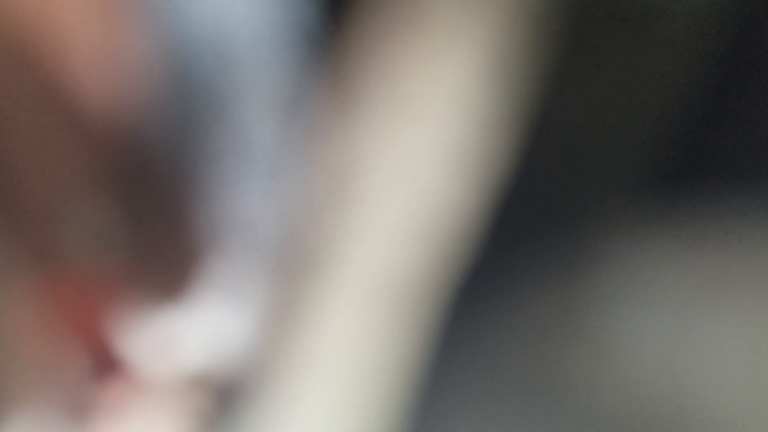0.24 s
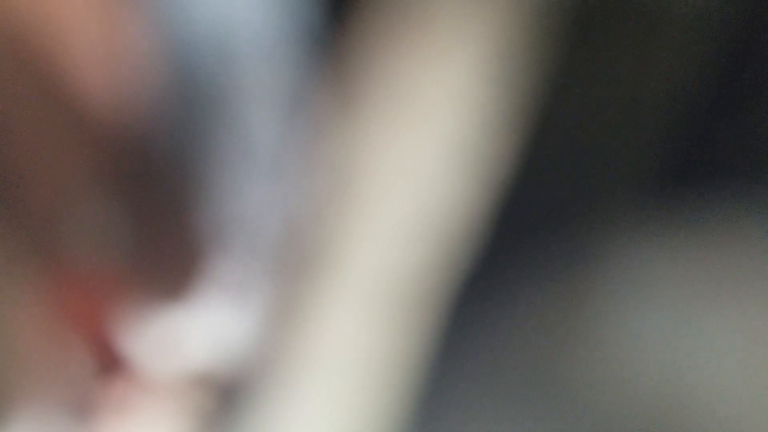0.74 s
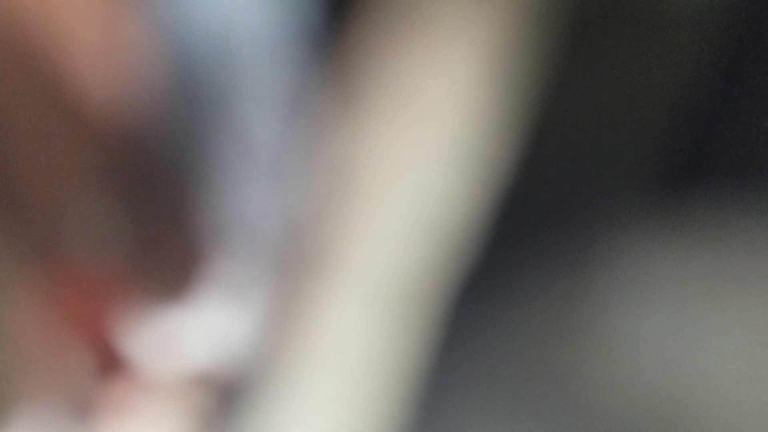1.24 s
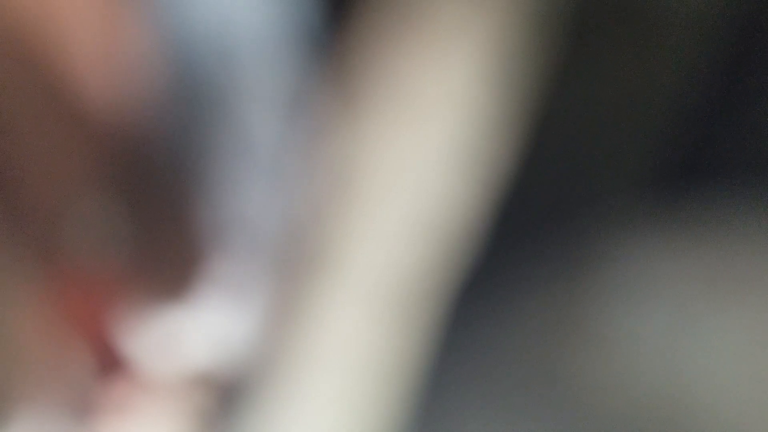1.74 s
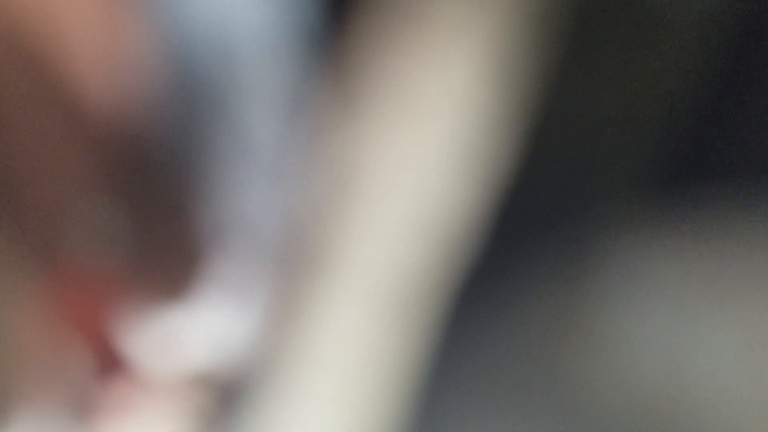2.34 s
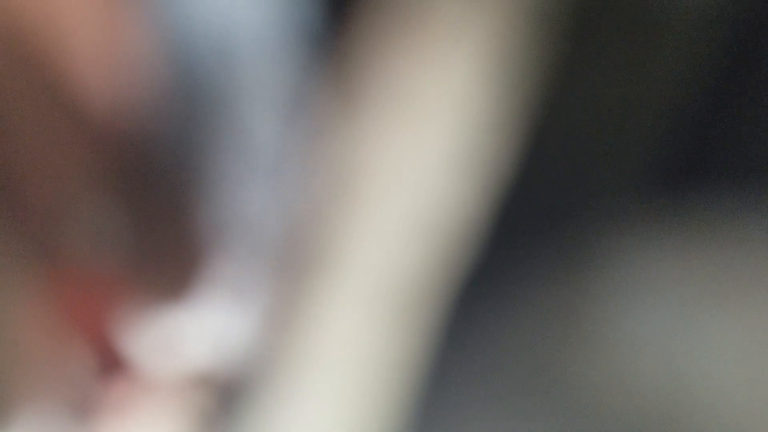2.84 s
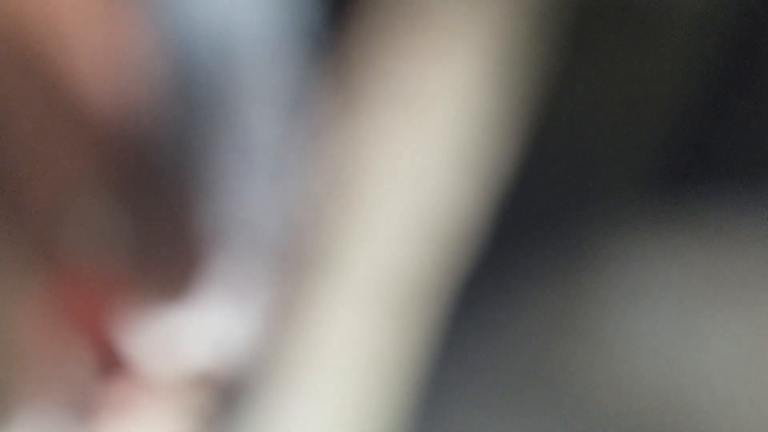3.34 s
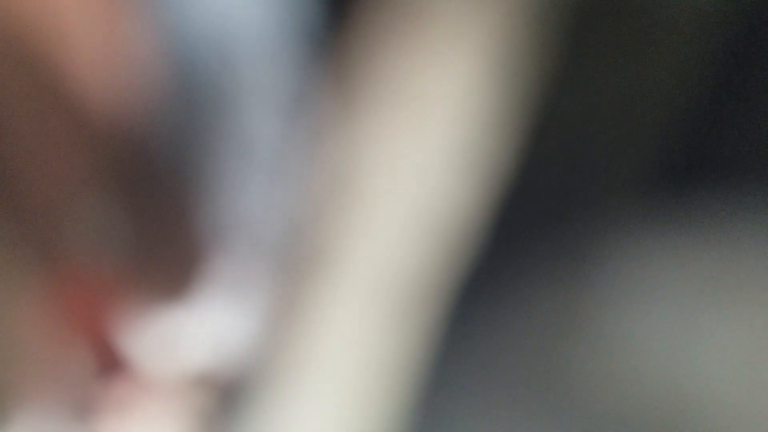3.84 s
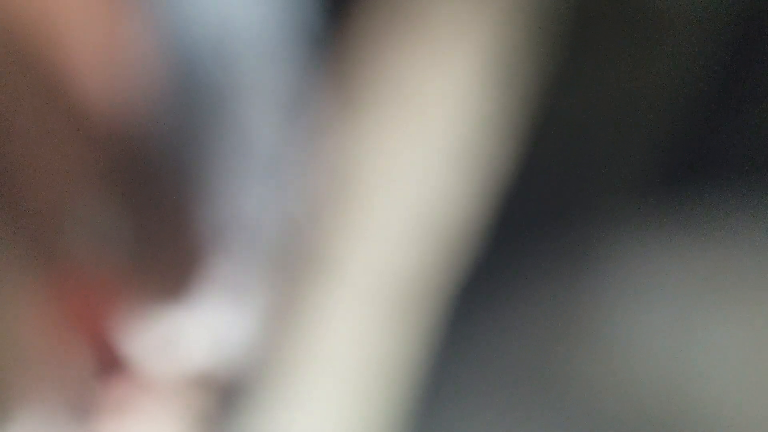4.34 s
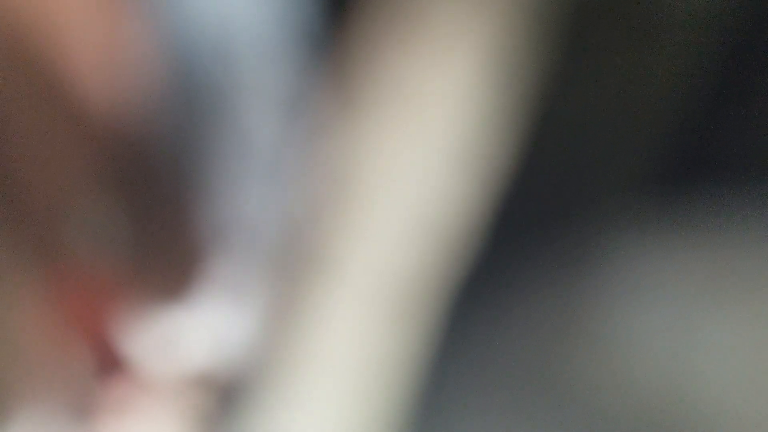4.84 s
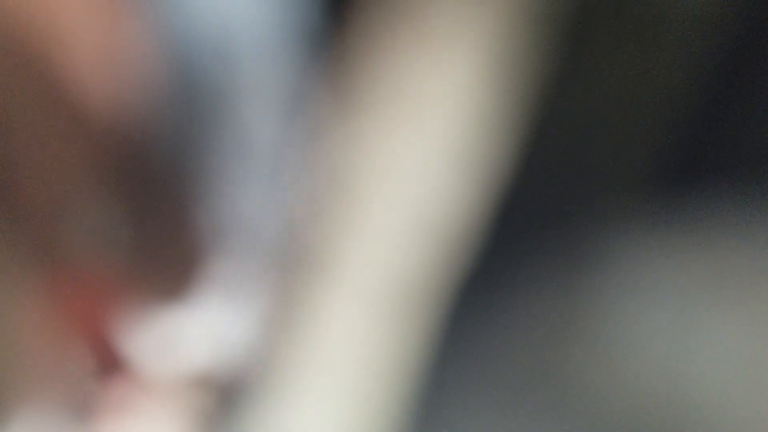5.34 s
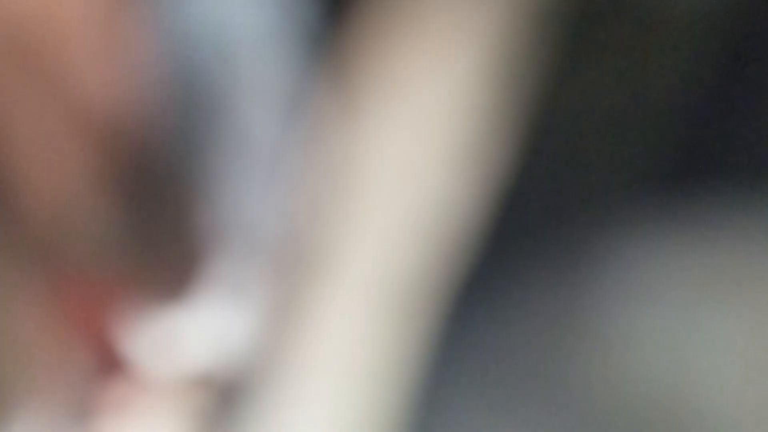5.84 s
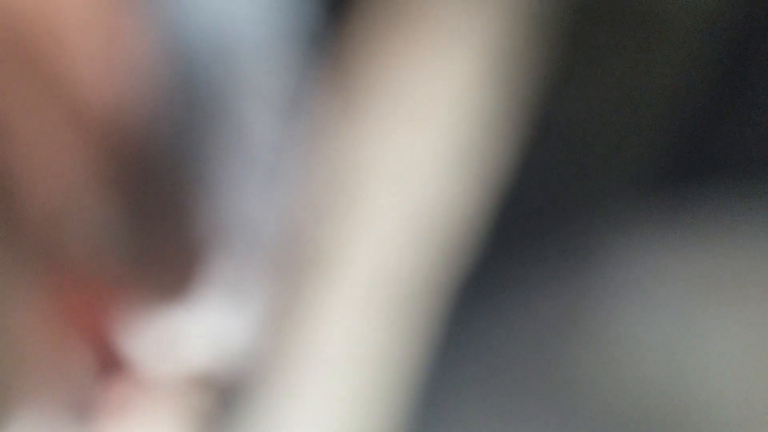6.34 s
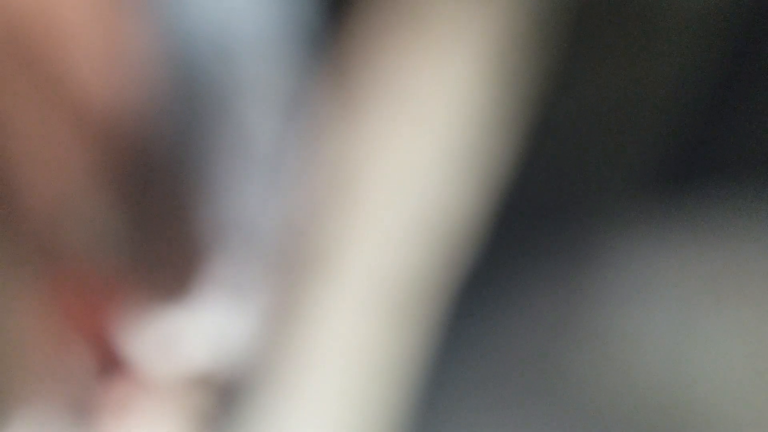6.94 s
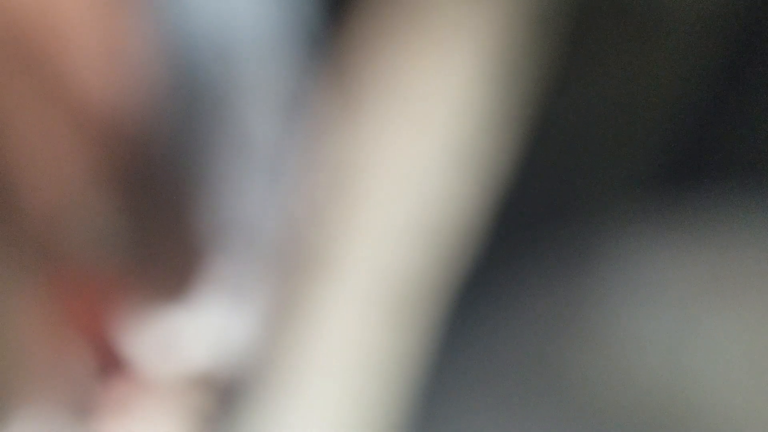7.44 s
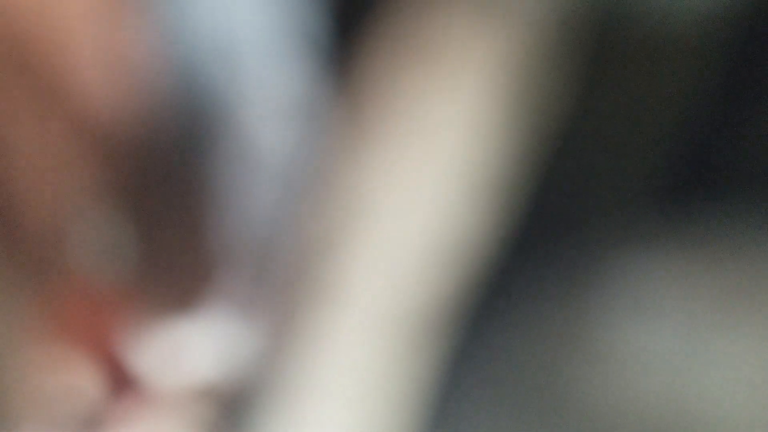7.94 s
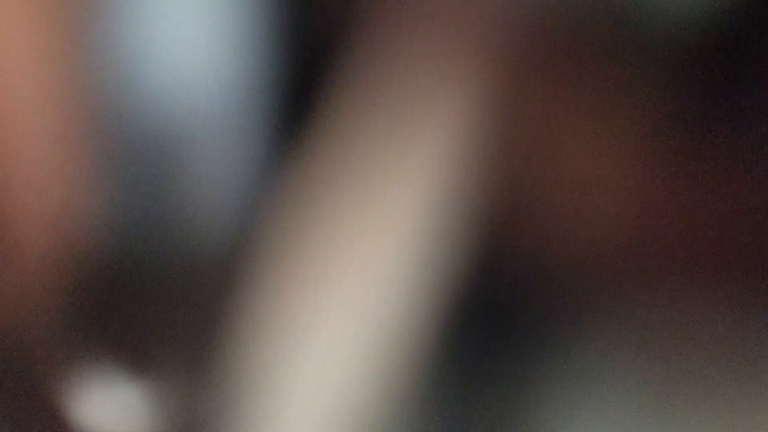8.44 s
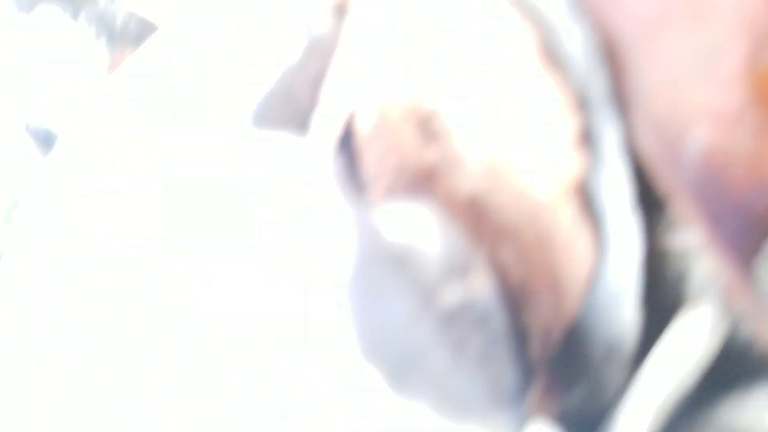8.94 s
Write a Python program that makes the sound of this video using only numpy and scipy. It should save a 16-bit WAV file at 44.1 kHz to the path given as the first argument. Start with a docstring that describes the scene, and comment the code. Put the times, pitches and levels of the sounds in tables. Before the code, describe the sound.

Liquid soap glugs into water, heard from inside a small, tightly echoing bucket. Sparse plops and skin rasps come first, then a strong cluster of hollow bubbles, later uneven gurgles with light splashing and low sloshing. Towards the end handling takes over: sticky clicks, scrapes, hard knocks and dull bumps on the microphone's casing, with faint regular glugs between and dry crinkles last.

```python
"""Liquid soap glugs from a plastic bottle into a bucket of water, very near two microphones.
From the start wet fingers slide and tick over a low rumble and a faint hiss; a first few bubbles ring.
At 2.6 s comes the strongest glug, several rings close together; more follow, rising in pitch, with splashes.
From 6.9 s fingers also knock on the casing; from 7.7 s five soft glugs come evenly. Last, the grip crinkles.
Bubbles are dying sines, rubbing many tiny ringing pops, sloshing low noise, and the echo fading noise."""
import sys
import numpy as np
from scipy import signal
from scipy.fft import rfft, irfft, next_fast_len
from scipy.io import wavfile
from scipy.ndimage import uniform_filter1d

SR = 44100
rng = np.random.default_rng(int(sys.argv[2]) if len(sys.argv) > 2 else 0)


def master_out(mix):
    """Clip the mix to full scale and print it as 16-bit PCM to the path in sys.argv[1]."""
    frames = np.transpose(np.atleast_2d(mix))
    ceiling = np.clip(frames, -1, 1)
    pcm = np.round(ceiling * 32767).astype(np.int16)
    wavfile.write(sys.argv[1], SR, pcm)


N = 405719
TIME = np.arange(N) / SR

# tone of scraping skin and droplets: (frequency [Hz], relative level [dB])
SCRAPE_TONE = [(250, -23), (700, 7.5), (1900, 7.5), (4000, 4.5), (8000, -3), (12500, -3), (16000, -10)]
# tone of dull pushes and moving water: (frequency [Hz], relative level [dB])
PUSH_TONE = [(25, -48.5), (70, -8), (150, -3.5), (260, -1), (450, -3), (620, -5.5), (900, -19), (2000, -57)]
# the microphones turn against the bucket: (time [s], delay of the left one [s])
LEFT_DELAY = [(2.6, -.00035), (4.3, .00025), (6.5, .0004)]


def bubbles(pan_db=2.8):
    """Air bubbles ring in the water; the strongest glug is several rings close together."""
    out = np.zeros((2, N))
    for s, hz, db, t60, rise in bubble_rings():
        ring = bubble(ports(s, SR // 4), hz, t60, rise)
        add(out, s, amp(db) * panned(pan_db) * ring)
    return out


def bubble_rings(even_count=5, even_start_s=7.722, even_gap_s=0.168):
    """Lists every ring: the uneven ones, where high ones chirp more steeply, then the evenly spaced glugs."""
    # rings of air bubbles: (time [s], starting pitch [Hz], level [dB], time to fade by 60 dB [s])
    uneven = [(.004, 404, -27.5, 0.059), (0.503, 524, -14.5, 0.092), (.582, 1200, -12.5, 0.048),
              (0.61, 1660, -25, 0.03), (.631, 1400, -31, .035), (.666, 620, -25.5, 0.066),
              (.787, 532, -32, 0.074), (.915, 492, -33.5, 0.093), (2.331, 285, -34, 0.23),
              (2.606, 501, -14.5, .1), (2.633, 342, -0.5, 0.051), (2.639, 473, -5, 0.14),
              (2.649, 426.6, -7.5, 0.15), (2.667, 349, -7.5, 0.08), (2.835, 310.4, -12, 0.1),
              (2.833, 471, -13, 0.069), (2.848, 306, -15, 0.067), (2.896, 296, -20.5, .16),
              (4.047, 471, -32, .15), (4.262, 484, -35, 0.073), (4.445, 274, -22.5, 0.031),
              (4.454, 572, -18.5, 0.086), (4.599, 291, -18.5, 0.23), (4.716, 414, -25, 0.11),
              (4.834, 398, -32, 0.081), (4.894, 818, -18, .1), (4.976, 271.8, -19.5, 0.09),
              (5.103, 267, -21.5, 0.16), (5.104, 402.5, -13, 0.051), (5.171, 383, -27, 0.11),
              (5.346, 490, -15.5, 0.023), (5.451, 252, -17, 0.13), (5.527, 335, -20.5, 0.11),
              (5.548, 220, -19.5, 0.11), (5.79, 245, -33.5, 0.062), (5.842, 520, -32.5, .15),
              (5.988, 510, -28, 0.064), (6.226, 546, -35, 0.13), (6.397, 462, -30, 0.22),
              (6.448, 368, -13, 0.12), (6.894, 471, -23, .07), (7.043, 449, -23, 0.098),
              (7.356, 587, -22, 0.027), (7.393, 242, -29.5, 0.084), (8.73, 676, -25.5, 0.066)]
    slow_rise, chirp_rise = 1.6, 47  # octaves per second: large bubbles climb slowly, small ones chirp
    chirp_above_hz = 1000
    found = []
    for s, hz, db, t60 in uneven:
        rise = chirp_rise if hz > chirp_above_hz else slow_rise
        found.append((s, hz, db, t60, rise))
    for k in range(even_count):
        found.append((even_start_s + k * even_gap_s, 247.3, -33, 0.11, 6.3))  # same columns, rise last
    return found


def bubble(t, hz, t60, rise, attack_s=0.001, wobble=0.042):
    """A dying sine: its pitch climbs near the surface and wavers as the bubble deforms."""
    waver = evened(uniform_filter1d(rng.standard_normal(t.shape[-1]), SR // 150))
    # wobble is the typical share by which the pitch wavers
    turns = hz * (t + np.log(2) * rise * t ** 2 / 2 + wobble * np.cumsum(waver) / SR)
    return np.sin(2 * np.pi * turns) * decay(t, t60) * (1 - np.exp(-t / attack_s))


def ports(s, length):
    """Time since a sound in the bucket reached the left and the right microphone."""
    lag = np.interp(s, *np.transpose(LEFT_DELAY))
    return np.maximum(np.arange(length) / SR - np.array([[lag], [-lag]]) / 2, 0)


def splashes(pan_db=4, full_db=-18, growth=0.092, most_push_db=-36):
    """The surface breaks: each ring starts with a noisy splash that grows with the ring's level."""
    splash_s, splash_db, tilt_db = 0.016, -27.5, -6  # level is set against the ring; tilt per octave
    push_db, push_hz, push_db_per_oct = -17, 382, -10  # the push is weaker for rings above push_hz
    out = np.zeros((2, N))
    for s, hz, db, _, _ in bubble_rings():
        force_db = db + growth * min(db - full_db, 0)  # a ring below full_db splashes a little less
        octaves_above = np.log2(max(hz / push_hz, 1))
        dull_db = min(force_db + push_db + push_db_per_oct * octaves_above, most_push_db)
        splash = burst(splash_s, force_db + splash_db, tilt_db, dull_db, attack_share=0.05)
        add(out, s, panned(pan_db) * splash)
    return out


def gurgles(per_s=280, scatter_oct=0.28, t60=0.019, rise=4, pan_db=3):
    """Soap folds into the water: a quick chain of overlapping bubbles whose pitch drifts."""
    # chains: (time [s], length [s], first pitch [Hz], last pitch [Hz], level [dB])
    chains = [(.675, 0.059, 2600, 1900, -56), (2.606, .06, 480, 424, -26.5), (2.68, .04, 418, 430, -40),
              (2.902, 0.036, 494, 560, -40), (2.936, 0.18, 327, 394, -50), (4.699, .02, 268, 580, -31),
              (4.871, 0.022, 626, 884, -24.5), (4.91, 0.069, 950, 1060, -38), (5.193, 0.032, 400, 556, -42),
              (5.364, 0.087, 473, 680, -38), (5.965, 0.13, 400, 1260, -47.5), (6.382, .3, 478, 474, -40.5)]
    out = np.zeros((2, N))
    for s, length, from_hz, to_hz, db in chains:
        t, chain = ports(s, SR // 10), np.zeros((2, SR // 2))
        count = int(per_s * length) + 1
        for k, (late, size, small) in enumerate(rng.random((count, 3))):
            share = (k + late) / count  # how far along the chain
            drift_hz = from_hz * (to_hz / from_hz) ** share
            hz = drift_hz * 2 ** (scatter_oct * (2 * small - 1))
            turns = hz * t * (1 + np.log(2) * rise * t / 2)
            ring = np.sin(2 * np.pi * turns) * decay(t, t60) * (1 - np.exp(-hz * t))
            add(chain, share * length, (.5 + size) * (1 - share / 2) * ring)
        chain *= np.sqrt(length * SR / np.sum(chain[0] ** 2))  # same power for every chain
        add(out, s, amp(db) * panned(pan_db) * chain)
    return out


def slosh(stir, side_db=2):
    """Stirred water: a soft, lumpy low wash of noise."""
    wash = paired(rng.standard_normal((2, N)), likeness=0.67) * flutter(depth_db=3.5, span_s=0.011)
    return stir * panned(side_db) * coloured(wash, PUSH_TONE)


def stirring(rasp, hand_db=-4.5, ring_db=-41.5, settle_s=0.17):
    """How strongly the water moves: it follows the hand, and each bubble ring adds a swirl that settles."""
    kicks = np.zeros(N)
    for s, _, db, _, _ in bubble_rings():
        kicks[max(round(s * SR), 0)] += amp(db + ring_db) ** 2
    swirl = signal.lfilter([1], [1, -np.exp(-2 / (settle_s * SR))], kicks)  # power, so it fades twice as fast
    return np.sqrt(swirl + (amp(hand_db) * rasp) ** 2)


def rubbing(skin, rasp, drops_db=-30, drops_per_s=26, drop_cycles=7):
    """Wet skin slides with uneven pressure: a fine hiss, a coarser rasp and stray droplets."""
    # tones of the fine hiss and the coarse rasp: (frequency [Hz], relative level [dB])
    skin_tone = [(200, -61), (1700, -14), (3700, 7.5), (7000, 0.5), (9000, 0), (12000, 6), (16000, 2.5)]
    rasp_tone = [(60, -44), (250, 10), (600, 10), (1100, 4), (2200, 3), (3500, -10.5), (6000, -15),
                 (12000, -43)]
    grip = slips(N, per_s=2200, spread_db=7.0, smooth=1.0, likeness=0.054)
    grip = grip * flutter(depth_db=2.0, span_s=0.0034) * flutter(depth_db=3.0, span_s=.018)
    drops = slips(N, drops_per_s, spread_db=5.5, smooth=0, likeness=0.17, cycles=drop_cycles)
    sound = skin * coloured(grip, skin_tone) + rasp * coloured(grip, rasp_tone)
    sound += amp(drops_db) * np.sqrt(rasp) * coloured(drops, SCRAPE_TONE)  # droplets keep falling in the lulls
    return side(TIME, reach=0.79) * sound


def pressure():
    """Gains of skin hiss and rasp over time: a slide starts lightly, firms up, then eases and lifts off."""
    # slides of the fingers: (start [s], length [s], fine hiss of skin [dB], coarse rasp [dB])
    slide_list = [(0, 0.12, -48.5, -50), (0.148, 0.32, -40.5, -47.5), (0.51, 0.42, -56.5, -53),
                  (1.256, 0.084, -59.5, -63), (1.478, 0.25, -49, -87), (2.244, 0.52, -51, -56),
                  (2.601, 0.095, -39.5, -31.5), (2.78, 0.4, -59.5, -48.5), (2.972, 0.24, -48.5, -62),
                  (3.189, 0.14, -41, -49.5), (3.209, 0.48, -52, -55), (3.881, 0.27, -48.5, -55),
                  (4.254, 0.61, -53.5, -52), (4.939, 0.76, -50, -46.5), (5.255, 0.26, -34.5, -40),
                  (5.814, 0.21, -45, -49.5), (6.03, 0.43, -58.5, -60), (6.392, 0.15, -40, -40.5),
                  (6.517, 0.35, -38.5, -43.5), (6.811, 0.077, -30, -32.5), (6.991, 0.17, -40.5, -41),
                  (7.23, 0.38, -56.5, -51), (7.526, 0.047, -32.5, -36.5), (7.9, 0.91, -55, -54.5),
                  (8.418, 0.29, -36, -38), (8.677, 0.63, -44, -43)]
    touch_db, peak_share, ease_db = -6, 0.37, -9.5  # firmest at this share of the length
    grip_db_per_s, lift_db_per_s = 469, -170  # how fast the finger lands and lifts off
    rest_db = -79  # resting fingers never keep quite still
    clock = TIME[::64][:N // 64]  # a coarse clock is enough for a slow gain
    power = np.full((2, N // 64), amp(rest_db) ** 2)
    for start, length, skin_db, rasp_db in slide_list:
        t = clock - start
        press_db = np.interp(t / length, [0, peak_share, 1], [touch_db, 0, ease_db])
        landing_db = grip_db_per_s * np.minimum(t, 0)
        lifting_db = lift_db_per_s * np.maximum(t - length, 0)
        shape = amp(press_db + landing_db + lifting_db)
        power += (amp([[skin_db], [rasp_db]]) * shape) ** 2
    return [np.interp(TIME, clock, np.sqrt(p)) for p in power]


def crackle(skin, per_s=28, spread_db=4.0, level_db=-21, follow=0.69, tilt_db=2.0):
    """Wet skin sticks and lets go in fine snaps, which stand out most under a light touch."""
    snaps = slips(N, per_s, spread_db, smooth=0, likeness=0.39, cycles=1.0)
    return amp(level_db) * skin ** follow * side(TIME, reach=1.6) * coloured(snaps, SCRAPE_TONE, tilt_db)


def strokes():
    """Skin catches, or liquid slaps, briefly beside the microphones."""
    # (time [s], length [s], scrape level [dB], tilt above 1 kHz [dB per octave], dull push level [dB])
    stroke_list = [(2.579, 0.021, -29.5, -0.5, -56), (2.601, 0.017, -19, -7, -45),
                   (2.629, 0.039, -19.5, -12, -42), (2.829, 0.011, -28.5, -5.5, -51),
                   (3.189, 0.046, -35, 1.5, -35), (3.249, 0.015, -24.5, 17.5, -38.5),
                   (5.342, 0.0051, -23.5, 5, -31), (5.446, .0034, -24.5, 2.5, -25.5),
                   (6.383, 0.015, -29, 0, -28), (6.447, 0.02, -30, -17, -19),
                   (6.635, 0.027, -29.5, 4.5, -29.5), (6.795, 0.011, -21.5, 2, -24.5),
                   (7.483, 0.015, -25, -1.5, -24.5), (7.501, 0.037, -19.5, -3.5, -23.5),
                   (7.693, 0.035, -35.5, -6, -43.5), (8.322, 0.042, -29, 2.5, -46.5),
                   (8.361, 0.026, -25, 0, -51), (8.428, .052, -22, -1, -25),
                   (8.522, 0.029, -28.5, 0, -39.5), (8.629, 0.0067, -28.5, 5.5, -41),
                   (8.789, 0.016, -28, -7.5, -26)]
    out = np.zeros((2, N))
    for s, *stroke in stroke_list:
        add(out, s, side(s, reach=1.66) * burst(*stroke, attack_share=0.27))
    return out


def burst(length, db, tilt_db, push_db, attack_share, release_s=0.0029):
    """A short burst of dense slips with a dull push of low noise beneath it."""
    t = np.arange(SR // 12) / SR
    attack = 1 - np.exp(-t / (attack_share * length))
    release = np.exp(-np.maximum(t - length, 0) / release_s)
    grains = slips(len(t), per_s=6300, spread_db=5.0, smooth=.4, likeness=0.077)
    scrape = coloured(grains, SCRAPE_TONE, tilt_db)
    push = coloured(paired(rng.standard_normal((2, len(t))), likeness=1.0), PUSH_TONE)
    return attack * release * (amp(db) * scrape + amp(push_db) * push)


def ticks(decay_s=0.0022, sharpness=3.16):
    """A drop or a sticking fingertip lets go: a brief burst of noise around one pitch."""
    # drops and fingertips: (time [s], level [dB], pitch [Hz])
    tick_list = [(0.2391, -19, 3070), (0.5038, -23, 2860), (0.5348, -22.5, 4830), (0.683, -33.5, 3900),
                 (0.728, -33.5, 1480), (0.896, -32.5, 3180), (1.5536, -20.5, 4700), (1.631, -25.5, 2700),
                 (2.499, -23, 3560), (2.604, -14, 2160), (3.21, -17, 2830), (3.259, -22, 2090),
                 (3.95, -20.5, 3800), (4.6, -18, 2720), (4.611, -18, 1300), (4.625, -33, 10200),
                 (4.9744, -25, 3400), (5.243, -18.5, 12100), (5.272, -24, 11200), (5.2908, -15, 1820),
                 (5.6602, -26.5, 1880), (5.896, -26, 2060), (6.225, -26.5, 11200), (6.6388, -11.5, 3500),
                 (6.686, -24.5, 2200), (6.804, -4.5, 3680), (6.862, -19.5, 2180), (7.112, -27, 2470),
                 (7.616, -32, 11700), (7.757, -17.5, 2050), (7.9418, -19.5, 1880), (8.423, -29, 1090),
                 (8.542, -10.5, 5700), (8.617, -22, 1400)]
    out, t = np.zeros((2, N)), np.arange(SR // 30) / SR
    for s, db, hz in tick_list:
        snap = paired(rng.standard_normal((2, len(t))), likeness=0.65) * np.exp(-t / decay_s)
        tick = signal.lfilter(*signal.iirpeak(hz, sharpness, SR), snap)
        add(out, s, amp(db) * side(s, reach=2.16) * tick / abs(tick).max())
    return out


def knocks(crack=0.6, crack_s=0.0044):
    """A finger strikes the casing: a noisy crack and a few quickly damped tones."""
    # strikes: (time [s], level [dB], tilt of the tones around 1 kHz [dB per octave])
    strikes = [(6.876, -17, -2), (7.184, -11.5, 2.5), (7.496, -6.5, 2), (7.529, -4.5, 6.5),
               (8.801, -13.5, -5), (8.879, -4, 1), (8.909, -9.5, 0), (9.19, -17.5, 0.5)]
    # tones of the casing: (middle pitch [Hz], relative level [dB], time to fade by 60 dB [s])
    modes = [(199, 6, 0.063), (420, 18.5, 0.0082), (1070, 12.5, 0.015), (1830, 6, 0.024),
             (2840, 14.5, 0.0037)]
    out, t = np.zeros((2, N)), np.arange(SR // 10) / SR
    for s, db, tilt_db in strikes:
        knock = crack * amp(2 * tilt_db) * rng.standard_normal(len(t)) * np.exp(-t / crack_s)
        for hz, mode_db, t60 in modes:
            turns = hz * rng.uniform(.9, 1.1) * t + rng.random()  # each strike detunes the tone a little
            level = amp(mode_db + tilt_db * np.log2(hz / 1000))
            knock += level * np.sin(2 * np.pi * turns) * decay(t, t60)
        add(out, s, amp(db) * side(s, reach=2.7) * knock / abs(knock).max())
    return out


def thuds(hz=125, t60=0.039, attack_s=0.00067):
    """The pad of a finger bumps the casing: a few dull cycles of a sine."""
    # bumps: (time [s], level [dB])
    bumps = [(7.539, -17), (8.813, -24), (8.824, -31), (8.928, -18), (9.006, -25.5)]
    out, t = np.zeros((2, N)), np.arange(SR // 10) / SR
    thud = np.sin(2 * np.pi * hz * t) * decay(t, t60) * (1 - np.exp(-t / attack_s))
    for s, db in bumps:
        add(out, s, amp(db) * side(s, reach=1.0) * thud)
    return out


def crumple(low_hz=1700, high_hz=5600):
    """The grip shifts: many small dry crinkles, kept to a middle band."""
    # level of the crinkling: (time [s], level [dB])
    crinkle_level = [(8.6, -66), (8.7, -52), (8.83, -42.5), (8.93, -43), (8.99, -51), (9.2, -55)]
    grains = slips(N, per_s=900, spread_db=2.0, smooth=0, likeness=0.31, cycles=1.2)
    band = signal.butter(2, [low_hz, high_hz], "bandpass", fs=SR, output="sos")
    s, db = np.transpose(crinkle_level)
    level = np.interp(TIME, s, amp(db), left=0)
    return level * side(TIME, reach=1) * evened(signal.sosfilt(band, grains))


def side(s, reach):
    """Left and right gains where the fingers are; reach grows with nearness to one microphone."""
    # where the fingers are: (time [s], left minus right, before reach scales it [dB])
    fingers = [(0, 10), (2.9, 7.5), (3.2, -4), (3.95, 5), (5.05, 7), (5.27, -1), (5.4, 3.5), (6.65, -2),
               (7.53, -2), (7.7, 6), (8.2, 1.5), (8.36, 12), (9.2, 8.5)]
    return panned(reach * np.interp(s, *np.transpose(fingers)))


def bucket(x):
    """Dense short reflections from the bucket wall and the room, the treble dying first."""
    # how long the echo lasts: (frequency [Hz], time to fade by 60 dB [s])
    echo_t60 = [(200, 0.17), (2000, 0.08), (8000, 0.037)]
    taps = rng.standard_normal((2, SR // 3))
    taps[:, :SR // 400] = 0  # a short gap before the first reflection
    hz, t, bands = signal.stft(taps, SR, nperseg=256)
    fading = bands * decay(t, read(echo_t60, hz)[:, None])
    tail = signal.istft(fading, SR, nperseg=256)[1]
    return signal.oaconvolve(x, tail / np.linalg.norm(tail[0]), axes=1)[:, :N]


def background(rumble_db=-54.5, hiss_db=-64):
    """Low room rumble and the hiss of the microphones, both shaped noise."""
    # tones of the two noises: (frequency [Hz], relative level [dB])
    rumble_tone = [(30, -13.5), (58, 4), (110, -1.5), (285, -16.5), (590, -29), (1650, -40.5)]
    hiss_tone = [(1500, -6.5), (3100, -13.5), (4100, 4), (6000, -6), (7100, 4.5), (7650, 6), (8600, -19),
                 (16000, -31)]
    rumble = coloured(paired(rng.standard_normal((2, N)), likeness=0.94), rumble_tone)
    hiss = coloured(rng.standard_normal((2, N)), hiss_tone)
    return amp(rumble_db) * rumble + amp(hiss_db) * panned(pan_db=13.0) * hiss


def slips(length, per_s, spread_db, smooth, likeness, cycles=0.65):
    """Wet friction: tiny pops of twelve pitches and many sizes, over a smooth hiss."""
    pitches = np.geomspace(450, 15000, num=12)
    grains, count = np.zeros((2, length)), int(per_s * length / SR / len(pitches)) + 1
    for hz in pitches:
        births = np.full((2, length), 1e-20)  # not quite zero, which keeps the filter fast
        place, size = rng.random((count, 2, 2)).T
        strength = amp(-spread_db * np.log(size + .01))
        np.put_along_axis(births, (place * length).astype(int), strength, 1)
        # each birth rings a small resonator that fades within a few cycles
        turn, fade = 2 * np.pi * hz / SR, np.exp(-hz / SR / cycles)
        ringing = signal.lfilter([1], [1, -2 * fade * np.cos(turn), fade ** 2], births)
        grains += np.sin(turn) * ringing
    pops = evened(np.diff(grains, prepend=0))
    return paired(pops + smooth * rng.standard_normal((2, length)), likeness)


def flutter(depth_db, span_s):
    """Uneven pressure: a random gain that changes over span_s."""
    width = max(int(span_s * SR), 1)
    drift = uniform_filter1d(uniform_filter1d(rng.standard_normal(N), width), width)
    return amp(depth_db * evened(drift))


def coloured(x, colour, tilt_db=0):
    """Gives x a spectrum, tilted above 1 kHz by so many dB per octave, at unit level."""
    size = next_fast_len(x.shape[1])
    hz = np.fft.rfftfreq(size, 1 / SR)
    gain = amp(read(colour, hz) + tilt_db * np.log2(np.maximum(hz, 1000) / 1000))
    return evened(irfft(rfft(x, size) * gain, size)[:, :x.shape[1]])


def paired(x, likeness):
    """Blends two unrelated signals into a partly alike left and right."""
    c = np.clip(likeness, 0, 1)
    return np.array([x[0], c * x[0] + np.sqrt(1 - c * c) * x[1]])


def panned(pan_db):
    """Left and right gains of constant total power; pan_db is left minus right."""
    gains = amp(np.array([pan_db, -pan_db]).reshape(2, -1) / 2)
    return gains / np.sqrt(np.mean(gains ** 2, 0))


def decay(t, t60):
    """A smooth dying away by 60 dB in t60 seconds."""
    return np.exp(-np.log(1000) * t / t60)


def amp(db):
    """Turns decibels into a gain."""
    return 10 ** (np.asarray(db) / 20)


def evened(x):
    """Scales x to unit average power."""
    return x / np.sqrt(np.mean(x ** 2) + 1e-20)


def read(points, hz):
    """Reads a table between its points, along a logarithmic frequency scale."""
    f, value = np.transpose(points)
    return np.interp(np.log(hz + 1), np.log(f + 1), value)


def add(mix, s, sound):
    """Adds a sound to the mix from time s on, cut off at the end."""
    part = mix[:, max(round(s * SR), 0):][:, :sound.shape[1]]
    part += sound[:, :part.shape[1]]


def scene(water_echo_db=-19, hand_echo_db=-15):
    """Water and hand, their short reflections, and the quiet room."""
    skin, rasp = pressure()
    water = bubbles() + splashes() + gurgles()
    hand = strokes() + ticks() + knocks() + thuds()
    echo = bucket(amp(water_echo_db) * water + amp(hand_echo_db) * hand)
    near = hand + rubbing(skin, rasp) + crackle(skin) + crumple()
    # the hand's sound reaches the two microphones at different times
    lag = np.round(np.interp(TIME, *np.transpose(LEFT_DELAY)) * SR).astype(int)
    near[0] = near[0].take(np.arange(N) - lag, mode="clip")
    return water + near + echo + background() + slosh(stirring(rasp))


def record(dry, low_cut_hz=38, edge_hz=16300):
    """The loudest peaks overload; then the low cut and the band limit."""
    low_cut = signal.butter(2, low_cut_hz, "highpass", fs=SR, output="sos")
    clipped = signal.sosfilt(low_cut, np.clip(dry, -1, 1))
    band_limit = signal.firwin(255, edge_hz, window=("kaiser", 9), fs=SR)
    return signal.oaconvolve(clipped, band_limit[None], "same")


dry = scene()
out = record(dry)
master_out(out)
```